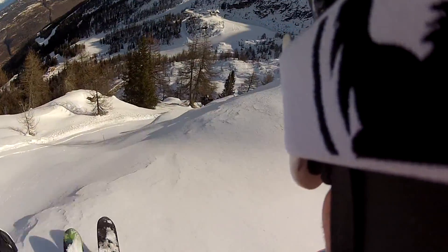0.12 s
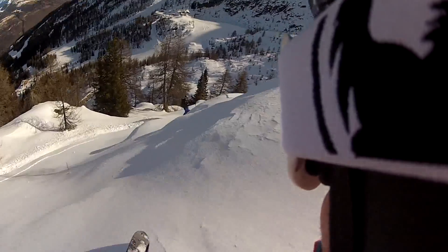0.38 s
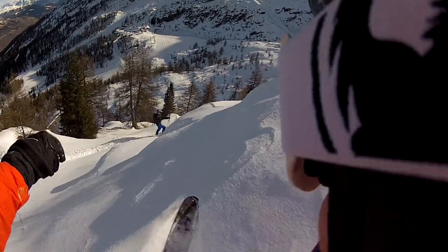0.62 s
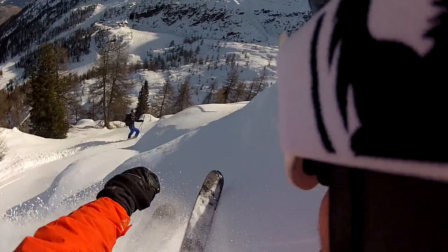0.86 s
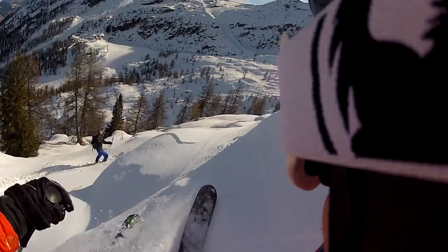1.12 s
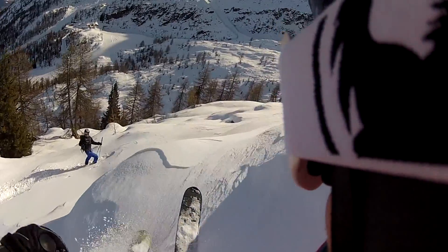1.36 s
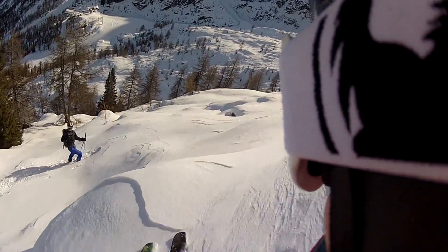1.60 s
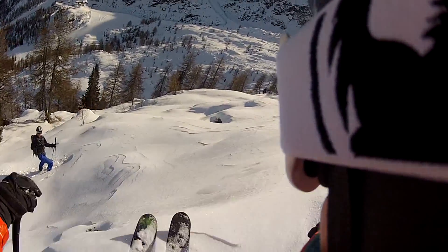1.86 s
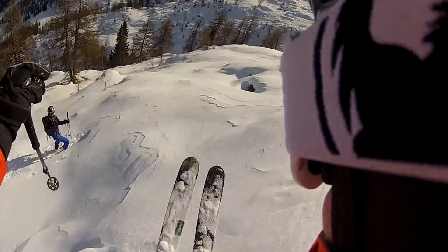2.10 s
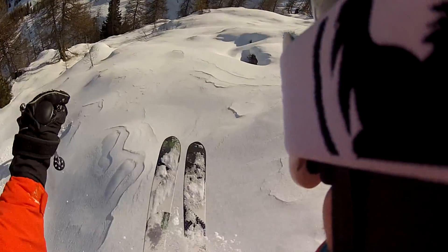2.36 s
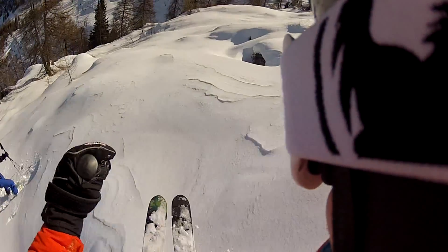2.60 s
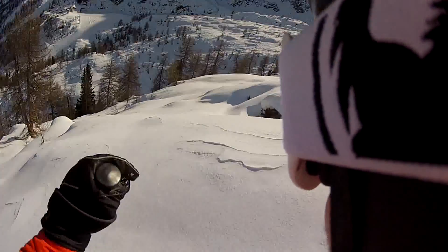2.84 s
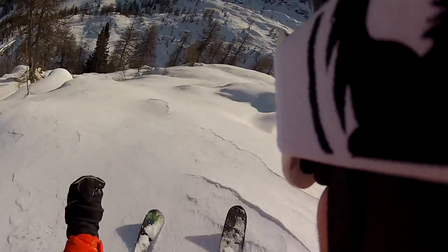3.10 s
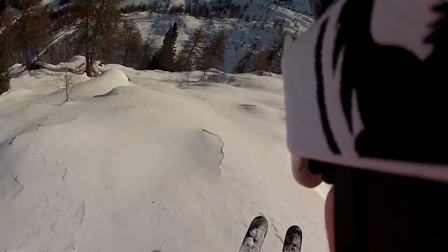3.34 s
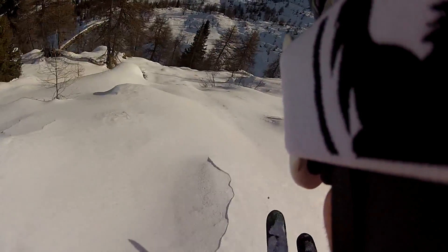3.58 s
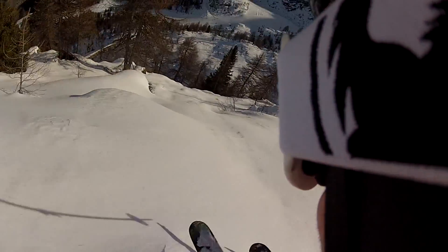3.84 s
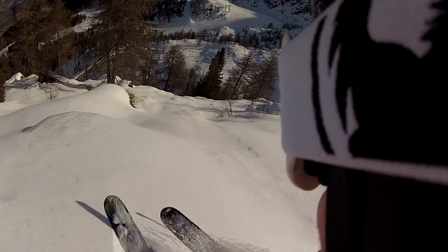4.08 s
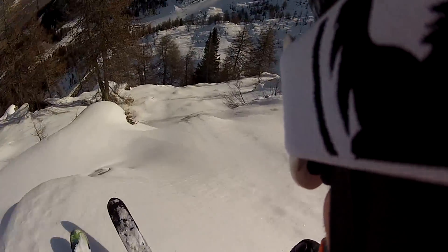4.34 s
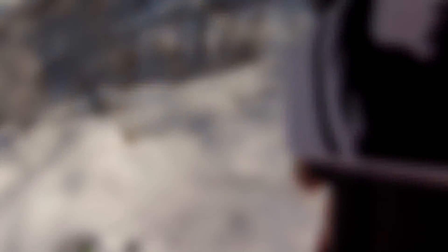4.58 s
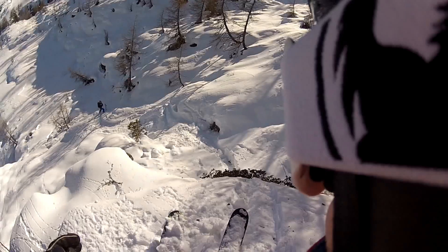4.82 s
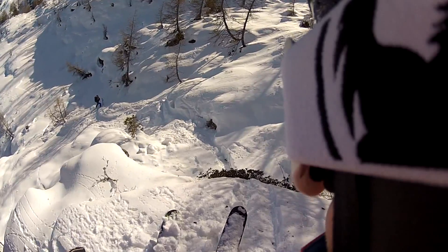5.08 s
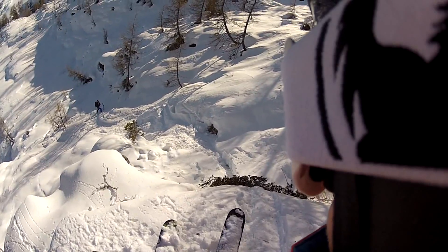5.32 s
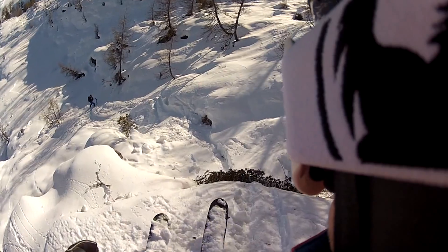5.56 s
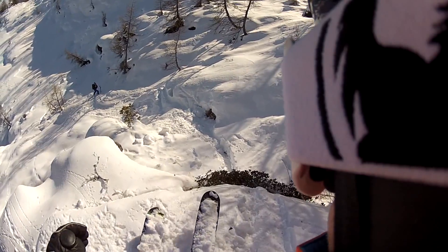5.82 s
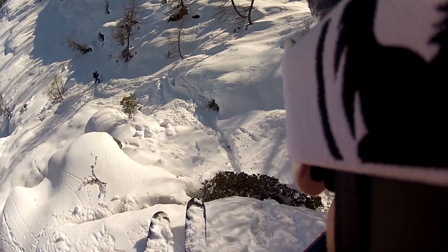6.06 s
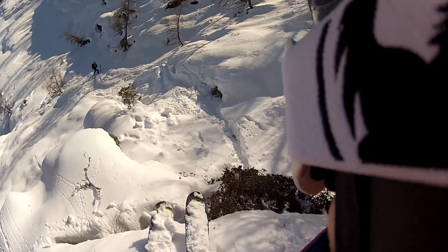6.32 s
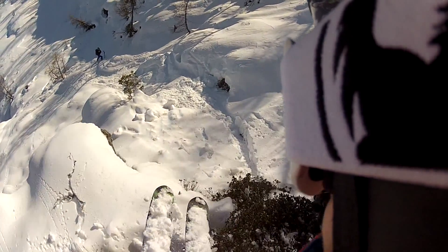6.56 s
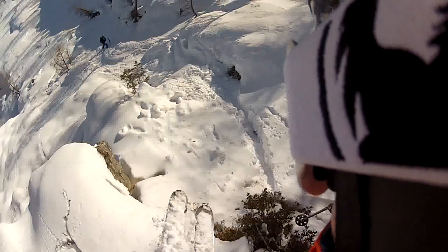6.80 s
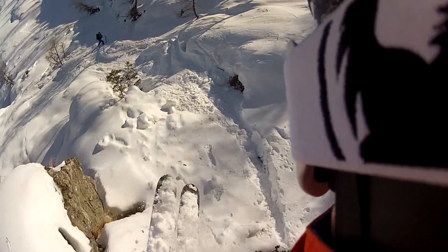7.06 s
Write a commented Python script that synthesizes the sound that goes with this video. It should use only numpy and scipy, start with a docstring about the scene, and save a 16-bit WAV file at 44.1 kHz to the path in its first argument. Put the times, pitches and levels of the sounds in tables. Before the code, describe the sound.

A skier's helmet microphone, sealed in a small plastic housing, picks up lumpy low wind and skis hissing through powder. Edges bite crust in short gritty scrapes, with ice crumbs ticking. Just after three seconds a hard knock cracks and distorts; more swishing and taps follow, then near quiet as the skis almost stop, before faint scrapes and ticks return.

```python
"""Skiing through deep snow

Skis swish and scrape in turns (noise mixed with breaking crystals), heard by a helmet camera in a closed housing.
Wind rumbles and flutters (noise in lumps), ice crumbs tick (short noise bursts), and gear taps the housing
(ringing modes); one hard knock overloads the input.
The camera samples slowly and holds each value, so the low spectrum is mirrored into the treble."""
import sys
import numpy as np
from scipy import signal
from scipy.fft import rfft, irfft, next_fast_len
from scipy.io import wavfile
from scipy.ndimage import uniform_filter1d, map_coordinates

SR = 44100
rng = np.random.default_rng(int(sys.argv[2]) if len(sys.argv) > 2 else 0)


def to_wav(s):
    """Save 16-bit WAV."""
    ch = np.atleast_2d(s).T  # columns
    pcm = np.round(np.clip(ch, -1, 1) * 32767)  # PCM
    wavfile.write(sys.argv[1], SR, pcm.astype(np.int16))


def to_linear_factor(level_db):
    """Convert decibel levels (scalar or array-like) to linear amplitude factors."""
    exponent = np.asarray(level_db, float) / 20
    return 10 ** exponent


N = 316396

# air speed past the helmet, as the strength of its rumble: (time [s], level [dB])
WIND = [(0, -41), (.7, -40.5), (.88, -27), (.95, -41.5), (1.65, -46), (2.1, -36.5), (2.3, -41.5),
        (2.75, -41), (2.87, -33.5), (3.15, -35), (3.25, -40), (3.8, -42.5), (3.9, -33), (4.3, -34.5),
        (4.6, -44.5), (5.1, -51), (5.85, -48.5), (6.1, -43.5), (6.4, -47), (6.55, -39), (6.75, -40),
        (6.83, -30.5), (7.0, -37.5), (7.17, -38.5)]
# colour of the wind's low rumble: (frequency [Hz], level [dB])
RUMBLE_COLOUR = [(7.1, -32), (12, 2.5), (27, 4.5), (75, -5.5), (110, -17), (140, -47.5), (240, -120)]
# colour of the flutter: (frequency [Hz], level [dB])
FLUTTER_COLOUR = [(41, -39), (70, -7.5), (104, 3), (172, -8), (215, -3), (363, -12), (450, -20.5),
                  (600, -35.5), (780, -32), (1320, -120)]
# colour of the faint even hiss: (frequency [Hz], level [dB])
HISS_COLOUR = [(150, -22.5), (600, 3.5), (5500, -8)]
# the bases slide through powder: (time [s], level [dB])
GLIDE = [(0, -46), (.1, -44.5), (.4, -49.5), (1.25, -59), (1.68, -49.5), (1.77, -53), (2.2, -58.5),
         (2.35, -54.5), (2.7, -55), (3.0, -40.5), (3.2, -56), (3.4, -50.5), (3.59, -47.5), (3.68, -52),
         (4.05, -40), (4.25, -44), (4.5, -45.5), (4.68, -61), (4.9, -65), (5.08, -77), (5.4, -60.5),
         (5.9, -67), (6.12, -48), (6.2, -63), (6.31, -55.5), (6.43, -56), (6.7, -49.5), (7.17, -58.5)]
# colour of the bases in powder: (frequency [Hz], level [dB])
SWISH_COLOUR = [(240, -42), (400, -11.5), (581, -10.5), (1050, 4), (1190, -0.5), (2070, -2.5), (2810, -15),
                (3600, -13), (4180, -24.5), (5420, -19), (6000, -49), (7800, -77.5), (13200, -120)]
# ice crumbs ticking: (time [s], peak level [dB])
TICKS = [(0.1147, -26), (0.6173, -25.5), (1.356, -41), (2.067, -27.5), (2.2433, -44.5), (2.2916, -30.5),
         (2.65, -35.5), (2.6664, -46), (2.701, -36.5), (2.7202, -29.5), (2.7432, -32.5), (3.317, -27),
         (3.8066, -26), (4.193, -36), (4.3415, -38.5), (4.374, -49), (4.46, -57), (4.5232, -36),
         (4.562, -39), (4.6558, -53), (4.6892, -37), (4.7491, -54), (6.7783, -30.5), (6.88, -48),
         (6.9556, -25), (7.0564, -32.5), (7.1, -27.5), (7.1414, -36.5), (7.1595, -32.5)]
# colour of a shattering crumb: (frequency [Hz], level [dB])
CRUMB_COLOUR = [(590, -24.5), (1000, -20), (1660, -10), (2990, -10.5), (3580, -6.5), (4860, -9.5),
                (6000, -13.5), (7800, -39), (13200, -120)]
# the edges bite and let go: (start [s], length [s], level at mid bite [dB])
BITES = [(0.445, 0.16, -31.5), (0.691, 0.17, -35.5), (0.817, 0.074, -29), (0.964, 0.27, -42.5),
         (1.282, .027, -47.5), (1.35, 0.043, -45), (1.45, 0.057, -44), (1.862, 0.13, -37.5),
         (2.002, 0.072, -38), (2.083, 0.09, -55.5), (2.332, 0.05, -47.5), (2.433, 0.027, -47.5),
         (2.526, 0.059, -44), (2.829, 0.056, -32.5), (2.887, 0.15, -43), (3.068, 0.075, -27),
         (3.178, 0.11, -49), (3.779, .07, -46.5), (3.897, 0.082, -34), (4.031, 0.034, -31.5),
         (4.075, 0.028, -50), (4.423, 0.21, -63), (5.442, 0.033, -57), (5.566, 0.2, -58.5),
         (5.659, 0.13, -52.5), (5.769, 0.12, -44.5), (5.917, 0.12, -52.5), (6.3, 0.13, -54.5),
         (6.509, 0.11, -43), (6.643, 0.061, -49), (6.892, .045, -42), (6.947, 0.058, -38.5),
         (7.037, 0.033, -43)]
# colour of the edges on crust: (frequency [Hz], level [dB])
SCRAPE_COLOUR = [(60, -28), (100, -12.5), (230, -11.5), (450, -23.5), (620, -22), (900, -18.5),
                 (1450, -18.5), (1870, -9), (2500, -15.5), (3000, -5.5), (3600, -8.5), (3950, -20.5),
                 (5300, -17), (6000, -25)]
# ringing modes of the housing: (frequency [Hz], strength before scatter [dB], time to fall 60 dB [s])
HOUSING_MODES = [(109.9, -2, 0.16), (320, -5, 0.024), (948, 0.5, 0.026), (1090, 2, 0.019),
                 (1400, 2.5, 0.018), (1650, 11.5, 0.011), (1950, -1, .018), (2270, -6, 0.016),
                 (3424, -3, 0.019), (3230, -21.5, 0.045), (4350, -14.5, .012)]
# dull jolts of the helmet: (time [s], peak level [dB])
JOLTS = [(0.876, -22.5), (4.021, -27.5)]
# taps and rubs on the housing: (time [s], peak level [dB], centre of the blow [Hz], length of the contact [s])
TAPS = [(.901, -27.5, 1265, 0.0066), (2.226, -38, 1120, 0.033), (2.331, -36, 1100, 0.057),
        (3.014, -22, 1060, 0.016), (3.034, -23.5, 2070, 0.0033), (3.339, -37.5, 1600, 0.0031),
        (3.369, -33.5, 1200, 0.04), (3.465, -41, 1070, 0.016), (4.022, -27.5, 1030, 0.011),
        (4.193, -21.5, 1230, 0.015), (4.206, -23, 1660, 0.0093), (4.215, -21, 1080, 0.017),
        (4.728, -46, 990, 0.014), (4.777, -50, 1410, 0.014), (5.373, -43.5, 930, 0.0085),
        (6.015, -47, 1000, .06), (6.075, -40.5, 1050, 0.055), (6.306, -36.5, 1025, 0.045),
        (6.673, -27, 910, 0.01), (6.913, -30, 1310, 0.018), (6.991, -32, 1180, 0.0051)]
# contacts of the hard knock:
# (time [s], peak level of the ring [dB], centre of the blow [Hz], push before its factor [dB], signed push factor)
KNOCK = [(3.1487, -3.5, 2900, -11.5, -0.45), (3.1525, -5, 2002, -6.5, 0.63), (3.1547, 6.5, 1620, 2, -0.85),
         (3.1579, 2, 1420, -5, 0.85)]

FLUTTER_DB, SHAKE_DB, RIDE_DB = -13.5, -6.5, -5.5  # flutter against the rumble; shake against the bite, the glide
HARD_BITE_DB, SHAKE_GROWS = -37, 0.3  # bites harder than this shake the helmet more than in proportion
SPRAY_DB = -5  # powder thrown up by a bite, against the bite
BOUNCE_S, BOUNCE_DB = 0.008, -7  # every crumb lands once more: delay, and level against the first landing
ARCH_DB, DIG_IN_DB_PER_S, LET_GO_DB_PER_S = 8, 378, 649  # weaker at its ends; swells in and fades fast
FIRST_BLOW = 4  # size of the first blow of a tap, before the tap is scaled to its peak
HOLD_HZ = 12000  # the camera's slow sampling rate


def unit(x):
    """Scaled to rms 1."""
    return x / np.sqrt(np.mean(x ** 2) + 1e-20)


def strength_curve(rows):
    """Amplitude at every sample, with straight lines in dB between the (time, level) points."""
    s, db = np.transpose(rows)
    return to_linear_factor(np.interp(np.arange(N) / SR, s, db))


def wobble(rate):
    """A smooth random curve, rate knots a second."""
    knots = rng.standard_normal(int(N * rate / SR) + 4)
    return map_coordinates(knots, [np.arange(N) * rate / SR])


def filtered(x, response):
    """x with its spectrum multiplied by a response of frequency."""
    m = next_fast_len(len(x) + 8192)
    spectrum = rfft(x, m) * response(np.fft.rfftfreq(m, 1 / SR))
    return irfft(spectrum, m)[:len(x)]


def coloured_noise(length, colour):
    """Random noise with the given colour, rms 1."""
    return coloured(rng.standard_normal(length), colour)


def coloured(x, colour):
    """x with the colour of (frequency, level) points, rms 1."""
    f, db = np.transpose(colour)
    return unit(filtered(x, lambda hz: to_linear_factor(np.interp(np.log(hz + 1), np.log(f + 1), db))))


def add_at(out, s, sound):
    """Adds a sound to out, starting at s seconds."""
    out[round(s * SR):][:len(sound)] += sound


def crunch(colour, per_second, spread_db, grain_share):
    """Noise and crystals breaking at random in varied sizes; uneven snow brightens patches of the spectrum."""
    breaks = rng.random(N) < per_second / SR
    sizes = to_linear_factor(spread_db * rng.exponential(size=N))
    grains = unit(breaks * rng.standard_normal(N) * sizes)
    mix = np.sqrt(grain_share) * grains + np.sqrt(1 - grain_share) * rng.standard_normal(N)
    z = signal.stft(mix, nperseg=512)[2]
    patches = uniform_filter1d(rng.standard_normal(z.shape), size=5, axis=0)  # smooth over frequency
    patches = uniform_filter1d(patches, size=8, axis=1)  # smooth over time
    patchy = signal.istft(z * to_linear_factor(2.2 * unit(patches)), nperseg=512)[1][:N]
    return coloured(patchy, colour)


def wind_rumble(wind):
    """Eddies press on the microphone in lumps, so low noise swells and sinks at random."""
    lumps = to_linear_factor(2.5 * wobble(12) + 0.62 * wobble(2.8))
    return wind * unit(coloured_noise(N, RUMBLE_COLOUR) * lumps)


def flutter(wind, bite, glide):
    """Wind flutters in quicker lumps; bites and the glide shake the helmet and add to it."""
    harder = (bite / to_linear_factor(HARD_BITE_DB)) ** SHAKE_GROWS
    shake = np.hypot(to_linear_factor(SHAKE_DB) * bite * harder, to_linear_factor(RIDE_DB) * glide)
    lumps = to_linear_factor(2.3 * wobble(25) + 1.7 * wobble(6))
    return np.hypot(to_linear_factor(FLUTTER_DB) * wind, shake) * unit(coloured_noise(N, FLUTTER_COLOUR) * lumps)


def hiss():
    """A faint even noise under everything."""
    return to_linear_factor(-67) * coloured_noise(N, HISS_COLOUR)


def powder_swish(bite, glide, bumps):
    """The bases hiss through powder, which sprays more in each bite."""
    powder = np.hypot(glide * to_linear_factor(1.6 * wobble(12)), to_linear_factor(SPRAY_DB) * bite)
    flicker = to_linear_factor(0.54 * bumps + 1.82 * wobble(60))
    return powder * flicker * crunch(SWISH_COLOUR, 900, spread_db=-1.0, grain_share=0.043)


def ice_ticks():
    """Each crumb shatters: a snap, then a spatter dying away, and a weaker bounce."""
    t, out = np.arange(SR // 20) / SR, np.zeros(N + SR)
    snap, spatter = to_linear_factor(-60 * t / 0.006), 0.4 * to_linear_factor(-60 * t / 0.022)
    shape = (snap + spatter) * (1 - np.exp(-t / 0.0005))
    bounces = [(s + BOUNCE_S, db + BOUNCE_DB) for s, db in TICKS]
    for s, db in TICKS + bounces:
        burst = shape * coloured_noise(len(t), CRUMB_COLOUR)
        add_at(out, s, to_linear_factor(db) * burst / np.max(np.abs(burst)))
    return out[:N]


def bite_pressure():
    """Pressure of the edges: every bite digs in, arches, then lets go."""
    t, power = np.arange(N) / SR, np.zeros(N)
    for s, length, db in BITES:
        off_centre = np.abs(t - s - length / 2)
        arch_db = ARCH_DB * np.clip(2 * off_centre / length, 0, 1) ** 2
        before_db = DIG_IN_DB_PER_S * np.clip(s - t, 0, 1)
        after_db = LET_GO_DB_PER_S * np.clip(t - s - length, 0, 1)
        power += to_linear_factor(db - arch_db - before_db - after_db) ** 2
    return np.sqrt(power)


def edge_scrape(bite, bumps):
    """The edges chatter over crust in separate bites."""
    chatter = to_linear_factor(1.3 * bumps + 1.5 * wobble(220))
    return bite * chatter * crunch(SCRAPE_COLOUR, 4000, spread_db=1.5, grain_share=0.2)


def blow(db, centre_hz, t, contact_s, reach_octaves):
    """The housing's modes near the centre of the blow ring, at new strengths each time; soft contact swells in."""
    hz, level_db, t60 = np.transpose(HOUSING_MODES)[:, :, None]
    scatter_db = rng.normal(0, 3, hz.shape)
    reach_db = -6 * (np.log2(hz / centre_hz) / reach_octaves) ** 2
    strength = to_linear_factor(level_db + scatter_db + reach_db - 60 * t / t60)
    ring = np.sum(strength * np.sin(2 * np.pi * hz * t), axis=0)
    ring = ring * (1 - np.exp(-t / contact_s))
    return to_linear_factor(db) * ring / np.max(np.abs(ring))


def helmet_jolts():
    """Dull thumps: only the lowest mode of the housing answers a slow jolt."""
    t, out = np.arange(SR // 4) / SR, np.zeros(N + SR)
    for s, db in JOLTS:
        add_at(out, s, blow(db, HOUSING_MODES[0][0], t, contact_s=0.00029, reach_octaves=0.4))
    return out[:N]


def housing_taps():
    """Gear taps and rubs the housing: a rough contact is many tiny blows, each making it ring."""
    t, out = np.arange(SR // 4) / SR, np.zeros(N + SR)
    for s, db, centre_hz, length in TAPS:
        grit = rng.standard_normal(len(t)) ** 3 * np.exp(-2 * t / length)
        grit[0] = FIRST_BLOW
        ring = blow(0, centre_hz, t, contact_s=0.001, reach_octaves=0.38)
        rub = signal.fftconvolve(grit, ring)[:len(t)]
        add_at(out, s, to_linear_factor(db) * rub / np.max(np.abs(rub)))
    return out[:N]


def hard_knock():
    """Hard contacts make the housing ring, crack and thud, and shove the air inside."""
    t, out = np.arange(SR // 4) / SR, np.zeros(N + SR)
    u = t / 0.0015  # the push of air peaks after 1.5 ms
    for s, db, centre_hz, push_db, push_factor in KNOCK:
        ring = blow(db, centre_hz, t, contact_s=0.0003, reach_octaves=0.5)
        push = to_linear_factor(push_db) * u * np.exp(1 - u)
        thud = blow(push_db - 6.5, 300, t, contact_s=0.0016, reach_octaves=0.46)
        crack = to_linear_factor(db - 8 - 60 * t / 0.012) * rng.standard_normal(len(t))
        add_at(out, s, ring + push_factor * (push + thud) + crack)
    return out[:N]


def scene():
    """Everything the microphone hears."""
    wind, glide, bite = strength_curve(WIND), strength_curve(GLIDE), bite_pressure()
    bumps = wobble(45)  # edges and bases feel the same bumps
    air = wind_rumble(wind) + flutter(wind, bite, glide) + hiss()
    snow = powder_swish(bite, glide, bumps) + ice_ticks() + edge_scrape(bite, bumps)
    housing = helmet_jolts() + housing_taps() + hard_knock()
    return (air + snow + housing)[None]


def band_limit(x):
    """A steep low-pass at the top of the band."""
    return signal.sosfilt(signal.butter(12, 16650, fs=SR, output="sos"), x)


def record(dry):
    """The camera: overload, a low-pass under half the slow rate, then sample and hold."""
    clipped = dry[0] / (1 + np.abs(dry[0] / 0.66) ** 8) ** (1 / 8)
    narrow = filtered(clipped, lambda hz: 1 / np.sqrt(1 + (hz / 5650) ** 60))
    # sampling makes mirrored copies around the slow rate
    sampled = narrow * (1 + 2 * np.cos(2 * np.pi * HOLD_HZ * np.arange(N) / SR))

    def hold(hz):
        """Holding each value dulls the treble; a slight lift and a steep low-pass follow."""
        lift = to_linear_factor(1.5 * (hz / HOLD_HZ) ** 2)
        return np.sinc(hz / HOLD_HZ) * lift / np.sqrt(1 + (hz / 15150) ** 120)

    held = filtered(sampled, hold)
    return band_limit(held[None])


dry = scene()
out = record(dry)
to_wav(out)
```